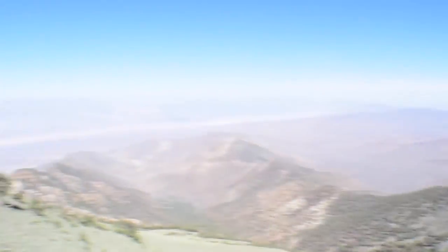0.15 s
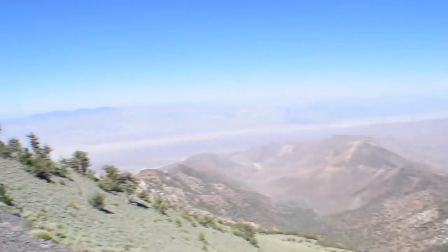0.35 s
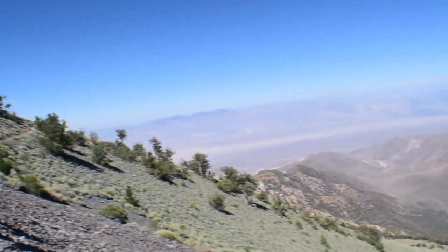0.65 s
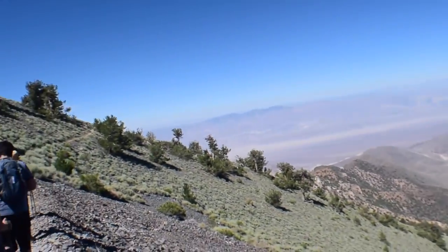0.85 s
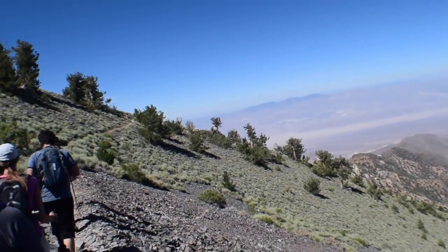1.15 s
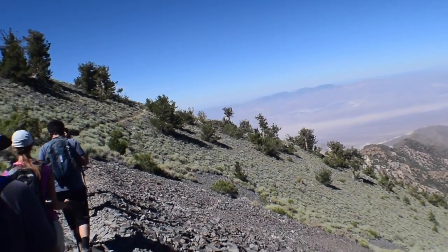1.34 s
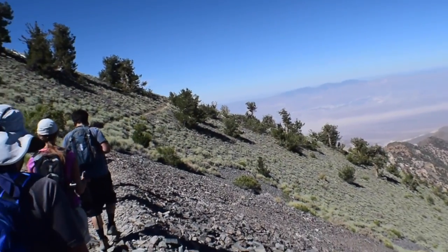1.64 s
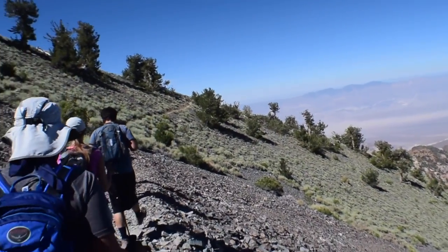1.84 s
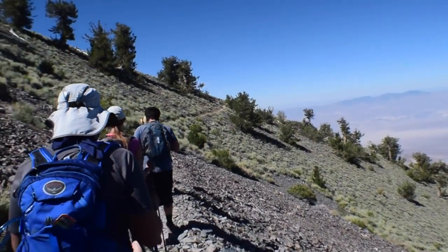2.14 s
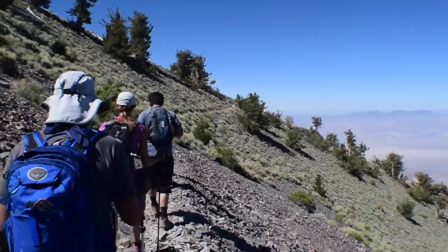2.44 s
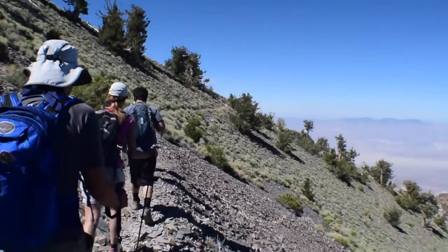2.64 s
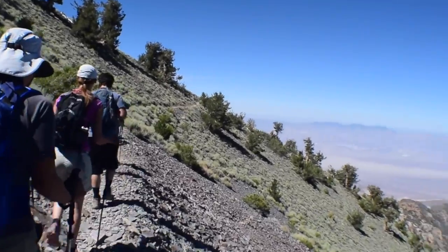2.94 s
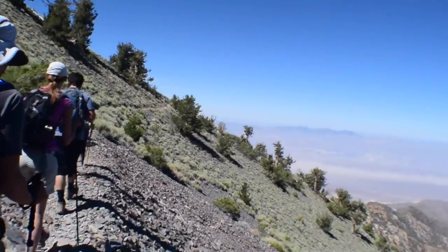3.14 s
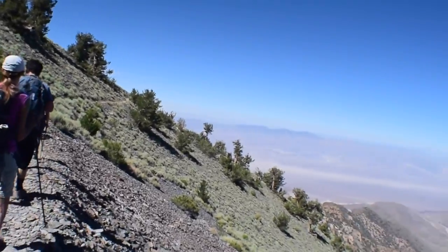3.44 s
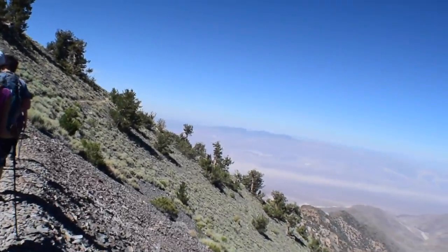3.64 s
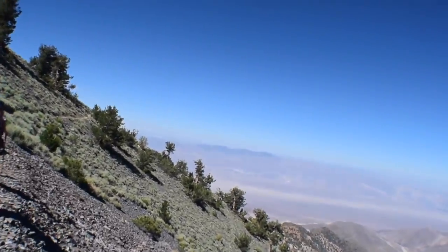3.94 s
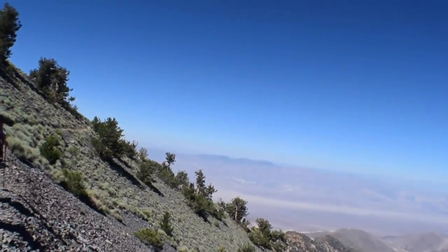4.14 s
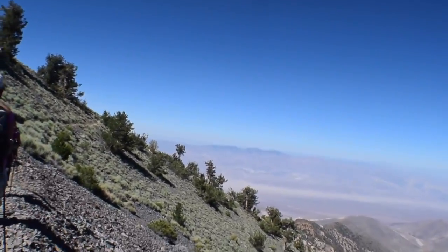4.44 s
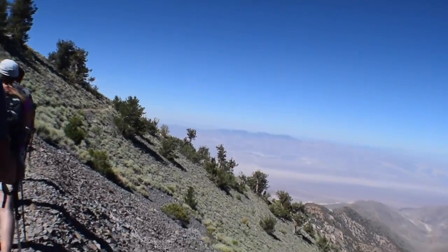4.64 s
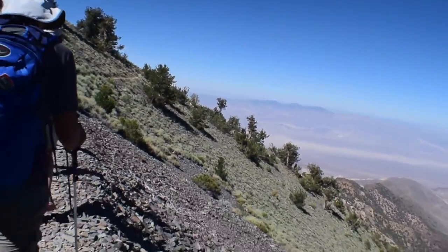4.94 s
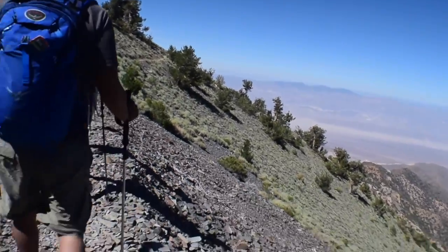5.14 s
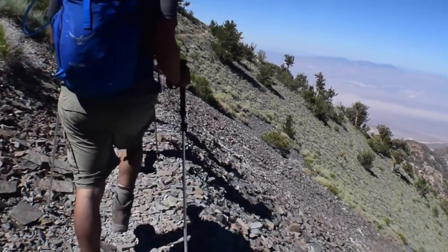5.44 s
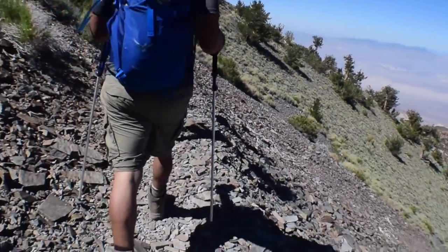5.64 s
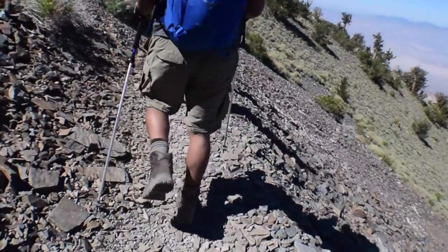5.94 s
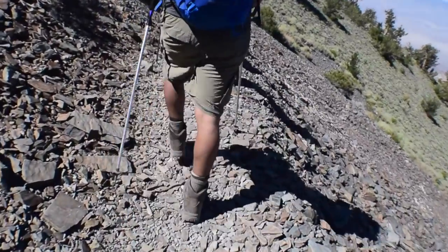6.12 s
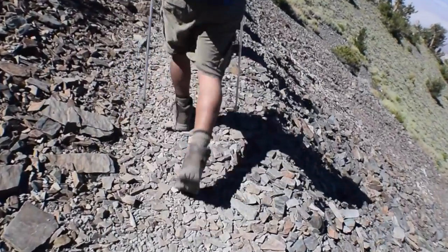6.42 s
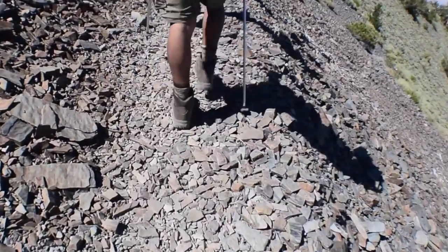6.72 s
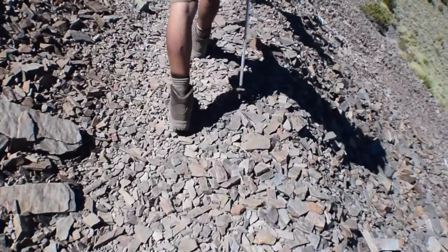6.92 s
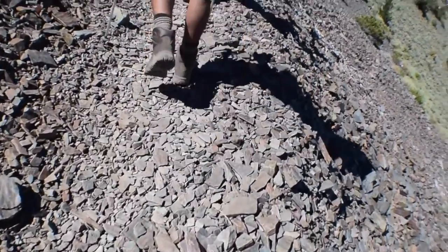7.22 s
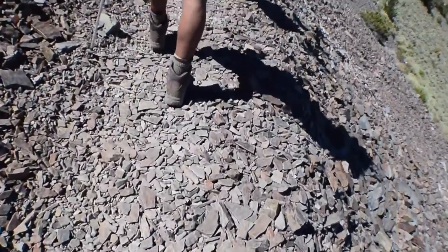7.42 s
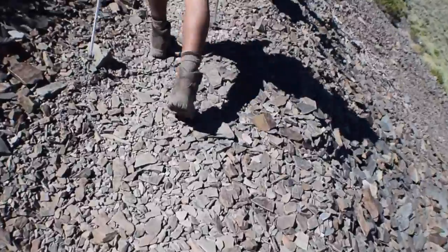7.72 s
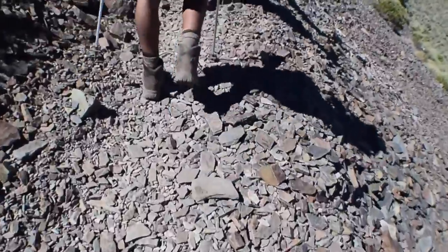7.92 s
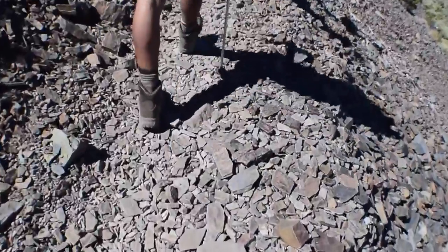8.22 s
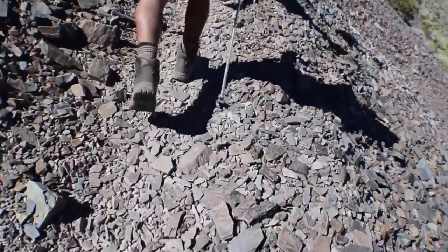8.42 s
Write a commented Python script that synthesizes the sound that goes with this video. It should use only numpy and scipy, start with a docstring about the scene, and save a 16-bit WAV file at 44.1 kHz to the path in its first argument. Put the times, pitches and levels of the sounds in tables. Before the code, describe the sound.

Several hikers crunch across loose flat shale, stone slabs clacking and chips ringing, with short lens-motor buzzes and light wind bumps on the microphone.

```python
"""Open steep slope of loose shale: hikers cross it close to a hand-held camera.
Farther boots are a wash of coloured noise, near boots a crunch of countless short ticks and hiss.
Slabs clack as rough noise bursts plus damped modes, chips ring as single sines until they land.
A lens motor buzzes in short bursts of overtones; light wind on the microphone is lumpy low noise."""
import sys
import numpy as np
from scipy import signal
from scipy.fft import rfft, irfft, next_fast_len
from scipy.io import wavfile
from scipy.ndimage import uniform_filter1d

SR = 44100
rng = np.random.default_rng(int(sys.argv[2]) if len(sys.argv) > 2 else 0)


def dump_mix(stems):
    """Bounce the given channels to the path in sys.argv[1] as a 16-bit WAV at rate SR."""
    frames = np.atleast_2d(stems).T  # one column per channel
    limited = np.clip(frames, -1, 1)  # hard clip at full scale
    pcm = np.round(limited * 32767).astype(np.int16)
    wavfile.write(sys.argv[1], SR, pcm)


N = 377937

# colour of stone on stone: freq_hz, level_db_per_hz
STONE_COLOUR = [(71, -40), (120, -18.5), (214, -6.5), (637, -1.5), (1860, -1), (4070, -2), (10100, -13),
                (14600, -34.5), (15500, -31), (16500, -63)]


def gain_of(db):
    """Decibels to gain."""
    return 10 ** (np.asarray(db) / 20)


def unit_rms(x):
    """Scales to rms 1 along the last axis."""
    return x / np.sqrt(np.mean(x ** 2, axis=-1, keepdims=True) + 1e-20)


def slow_noise(shape, width):
    """Noise smoothed twice over width samples, rms 1."""
    once = uniform_filter1d(rng.standard_normal(shape), width)
    return unit_rms(uniform_filter1d(once, width))


def read_spectrum(points, hz):
    """Interpolates dB values on a log-frequency axis."""
    f, value = np.transpose(points)
    return np.interp(np.log(hz + 1), np.log(f + 1), value)


def curve(rows, column):
    """One table column against time, sample by sample."""
    rows = np.array(rows)
    return np.interp(np.arange(N) / SR, rows[:, 0], rows[:, column])


def add(mix, start_s, sound):
    """Mixes a sound in at a time."""
    part = mix[round(start_s * SR):][:len(sound)]
    part += sound[:len(part)]


def coloured(x, points):
    """Filters x by a spectrum in dB."""
    length = x.shape[-1]
    size = next_fast_len(length)
    gain = gain_of(read_spectrum(points, np.fft.rfftfreq(size, 1 / SR)))
    return irfft(rfft(x, size) * gain, size)[..., :length]


def bands(x):
    """Splits x into body, low and high bands that sum to x."""
    # crossovers: low_to_body_hz, body_to_high_hz
    edges_hz = (1200, 5000)
    length = x.shape[-1]
    size = next_fast_len(length)
    hz, spectrum = np.fft.rfftfreq(size, 1 / SR), rfft(x, size)
    low, below_high = (1 / (1 + (hz / edge) ** 4) for edge in edges_hz)
    shares = (below_high - low, low, 1 - below_high)
    return [irfft(spectrum * share, size)[..., :length] for share in shares]


def far_boots():
    """Distant steps blur into a smooth wash: coloured noise of slowly changing level and treble."""
    # wash spectrum: freq_hz, level_db_per_hz
    wash_colour = [(59, -48), (100, -19), (210, -1.5), (634, 3.5), (4110, -9.5), (9610, -23), (14400, -21),
                   (16000, -40)]
    # wash level: time_s, level_db, treble_re_level_db
    wash_level = [(0, -60, -6), (1.0, -62.5, -3), (2.3, -57.5, -3.5), (3.55, -56.5, 3.5), (5.0, -55, 0),
                  (5.6, -57.5, 2), (7.1, -56, -7), (8.57, -56.5, 6)]
    body, low, high = bands(unit_rms(coloured(rng.standard_normal(N), wash_colour)))
    treble = gain_of(curve(wash_level, 2)) * high
    return gain_of(curve(wash_level, 1)) * (body + low + treble)


def wind(lumpy_db=0.5):
    """Low, lumpy air pressure at the microphone."""
    # wind level: time_s, level_db
    wind_level = [(0.0, -73), (0.19, -87), (0.36, -61), (1.22, -82), (1.41, -56.5), (1.6, -75), (3.65, -81),
                  (3.72, -46.5), (3.87, -63.5), (3.96, -43), (4.3, -86), (4.49, -58), (5.01, -77),
                  (7.21, -81), (7.25, -67.5), (8.57, -89)]
    # wind spectrum: freq_hz, level_db_per_hz
    buffet_colour = [(12, -40), (20, -39), (59, -16.5), (112, -12), (200, -15.5), (260, -49), (440, -120)]
    lumps = gain_of(lumpy_db * slow_noise(N, 2000))
    buffet = unit_rms(coloured(rng.standard_normal(N), buffet_colour) * lumps)
    return buffet * gain_of(curve(wind_level, 1))


def lens_motor(step_hz=333.7, waver_db=4.0, fade_db=6.0):
    """Overtones 7 to 22 of a stepping motor through the camera body, each wavering."""
    # motor bursts: start_s, level_db, length_s
    bursts = [(.265, -46, .125), (.53, -44, .12), (1.86, -46, .12), (2.12, -45, .125), (2.43, -51, .1),
              (2.72, -50, .08), (2.84, -46, .08), (3.04, -50, .09), (3.135, -47, .11), (3.41, -48, .1),
              (5.7, -48, .12), (5.99, -47, .13), (6.3, -50, .11), (6.582, -45, .14)]
    # what the camera body passes on: freq_hz, level_db
    housing = [(2300, -22), (2670, -11), (3000, -10), (3340, -6), (3670, -10), (4005, 0), (4340, -16),
               (5005, -12), (5400, -18), (7400, -24)]
    out = np.zeros(N)
    hz = step_hz * np.arange(7, 23)[:, None]
    for start_s, db, length_s in bursts:
        t = np.arange(0, length_s, 1 / SR)
        phase = rng.random((len(hz), 1))
        waver = waver_db * slow_noise((len(hz), len(t)), 500)
        overtones = np.sin(2 * np.pi * (hz * t + phase))
        buzz = (gain_of(read_spectrum(housing, hz) + waver) * overtones).sum(0)
        fade = gain_of(db - fade_db * t / length_s)
        add(out, start_s, fade * buzz * signal.windows.tukey(len(t), .15))
    return out


def rings(rise_s=.0008, damped_s=.003):
    """A chip or slab sings one bending mode in flight and is damped at once when it lands."""
    # free rings: start_s, pitch_hz, level_db, t60_s, flight_s; the 4010 Hz row at 3.0385 s is a plain tone that
    # sounds with the motor burst there, not a chip
    ring_rows = [(0.0573, 5480, -18.5, 0.024, 0.016), (0.183, 4002, -28, 0.048, 0.0088),
                 (0.817, 2650, -36, 0.076, 0.022), (0.91, 9360, -33, 0.05, 0.05),
                 (0.9674, 9400, -24.5, 0.069, 0.035), (0.969, 14987, -54, 0.12, 0.03),
                 (1.1, 6640, -36, 0.063, 0.04), (1.3413, 6955, -25.5, 0.12, 0.023),
                 (1.352, 9120, -33, 0.077, 0.032), (1.395, 6300, -34, 0.028, 0.015),
                 (1.44, 9100, -42, 0.052, 0.018), (1.638, 5530, -40, 0.037, 0.013),
                 (2.046, 7930, -27, 0.052, 0.02), (2.305, 7821, -45.5, 0.16, 0.05),
                 (2.345, 10295, -46.5, 0.15, 0.025), (2.3587, 7819, -37, 0.042, 0.027),
                 (2.563, 10100, -25, 0.06, 0.015), (2.5624, 4110, -14.5, 0.088, 0.028),
                 (2.585, 7300, -15, 0.024, 0.006), (2.591, 7390, -10.5, 0.038, 0.015),
                 (2.6265, 5338, -18, 0.052, 0.021), (2.6424, 5006, -15.5, 0.11, 0.028),
                 (2.667, 5000, -23.5, 0.11, 0.055), (2.6876, 7950, -26, 0.033, 0.02),
                 (3.0385, 4010, -31, 0.092, 0.042), (3.164, 5300, -20.5, 0.041, 0.013),
                 (3.1653, 10134, -35, 0.062, 0.04), (3.217, 7819, -16.5, 0.056, 0.028),
                 (3.39, 6570, -32, 0.057, 0.015), (3.415, 6600, -44, 0.11, 0.036),
                 (3.7654, 4010, -20, 0.19, 0.029), (3.8025, 5445, -17, 0.055, 0.038),
                 (3.825, 4032, -27, 0.08, 0.02), (3.8457, 3880, -0.5, 0.026, 0.048),
                 (4.0222, 5827, -18, 0.031, 0.019), (4.0348, 3140, -25.5, 0.2, 0.061),
                 (4.036, 6960, -30, 0.08, 0.026), (4.066, 3200, -24, 0.088, 0.035),
                 (4.11, 5870, -36, 0.2, 0.05), (4.11, 7673, -35, 0.1, 0.03),
                 (4.396, 8100, -29, 0.055, 0.021), (4.431, 732, -21.5, 0.038, 0.03),
                 (4.68, 6550, -20, 0.048, 0.015), (4.68, 7560, -25, 0.06, 0.015),
                 (4.6964, 8223, -29, 0.17, 0.047), (4.7807, 6500, -16.5, 0.076, 0.055),
                 (4.7806, 6866, -29.6, 0.286, 0.071), (4.8402, 6514, -21, 0.095, 0.038),
                 (5.109, 5359, -38, 0.422, 0.16), (5.1561, 5370, -18.5, 0.11, 0.048),
                 (5.19, 5364, -43, 0.11, 0.06), (5.279, 9570, -27, 0.041, 0.03),
                 (5.3314, 8917, -23.5, 0.059, 0.041), (5.3431, 7763, -24, 0.064, 0.059),
                 (5.391, 8917, -36.5, 0.19, 0.056), (5.41, 7763, -34, 0.12, 0.033),
                 (5.502, 8928, -24.5, 0.053, 0.042), (5.9818, 8300, -32, 0.04, 0.026),
                 (6.1766, 5472, -28.5, 0.18, 0.05), (6.2456, 10920, -35.5, 0.051, 0.018),
                 (6.393, 7400, -14, 0.1, 0.037), (6.3938, 9318, -36, 0.16, 0.024),
                 (6.394, 5530, -12, 0.024, 0.021), (6.708, 5800, -24.5, 0.027, 0.015),
                 (6.7328, 6368, -36, 0.084, 0.039), (7.591, 10720, -15, 0.015, 0.039),
                 (7.634, 7464, -36, 0.22, 0.036), (7.667, 7464, -23.5, 0.039, 0.029),
                 (7.7422, 8060, -27, 0.047, 0.021), (7.7959, 5585, -33, 0.061, 0.016),
                 (7.8094, 2958, -32.5, 0.07, 0.031), (7.952, 395, -31.5, 0.053, 0.03),
                 (8.3566, 12067, -41.5, 0.039, 0.023), (8.4219, 5700, -20, 0.056, 0.026),
                 (8.4889, 6500, -15, 0.024, 0.034), (8.4893, 5700, -29, 0.138, 0.021)]
    out = np.zeros(N)
    for start_s, hz, db, t60_s, flight_s in ring_rows:
        t = np.arange(0, flight_s + .02, 1 / SR)
        landing = np.exp(-np.maximum(t - flight_s, 0) / damped_s)
        shape = (1 - np.exp(-t / rise_s)) * landing
        tone = np.sin(2 * np.pi * (hz * t + rng.random()))
        add(out, start_s, gain_of(db - 60 * t / t60_s) * shape * tone)
    return out


def slope(x, t60_s=0.048):
    """Short scatter from the stony ground: sparse taps that die fast."""
    t = np.arange(4000) / SR
    taps = rng.choice([-1., 1.], len(t)) * (rng.random(len(t)) < .05)
    taps *= gain_of(-60 * t / t60_s) * (t > .002)
    return signal.oaconvolve(x, taps / np.linalg.norm(taps))[:N]


def clacks(thud_slower=1.63, snap_faster=0.48, spread=0.08, lead_db=-20, lead_s=0.00055,
           rough_db=2.5, push_db=8.5):
    """Each knock is a rough burst plus the slab's damped modes; bass lingers, treble dies first."""
    # slab knocks: time_s, level_db, pitch_hz, thud_re_level_db, snap_re_level_db, t60_s
    knock_rows = [(0.0573, -28, 4610, -33, 9.5, 0.022), (0.151, -26.7, 1890, -32, -10, 0.023),
                  (0.2223, -34, 3300, -12, -5, 0.05), (0.25, -38.5, 1300, 0, 2.5, 0.027),
                  (0.312, -41, 1180, 1.5, -17, 0.025), (0.4091, -25.5, 3120, -8, 5, 0.037),
                  (0.4262, -23, 3490, -38, 9, 0.044), (0.433, -28, 2360, -34, -2, 0.073),
                  (0.4778, -31.5, 1530, 6.3, -21, 0.012), (0.515, -32.5, 1950, -8.5, 5, 0.049),
                  (0.5562, -21, 1180, -2.5, -38, 0.011), (0.6002, -21.5, 1770, -19, 2, 0.025),
                  (0.627, -33.5, 1220, 1.5, -14, 0.0094), (0.662, -32, 2276, -22, -10, 0.1),
                  (0.7187, -34.5, 2470, -14, -21, 0.075), (0.7548, -37, 2330, -5.5, 1, 0.21),
                  (0.7884, -26, 1690, -10, -17.5, 0.012), (0.8598, -38.5, 2460, -8, 3.5, 0.09),
                  (1.0349, -40.5, 2220, -14, -21, 0.057), (1.0586, -35.5, 2180, -9, -29, 0.083),
                  (1.1004, -38.5, 2180, -10, 5, 0.044), (1.2157, -34.5, 2100, -25, 2, 0.02),
                  (1.227, -29.5, 4200, -30, -1, 0.012), (1.243, -37.5, 4230, -12, 1.5, 0.052),
                  (1.3051, -19.5, 2120, -23, -5.5, 0.041), (1.3324, -25.5, 1680, -15, -27, 0.039),
                  (1.381, -42, 3100, -20, 1, 0.03), (1.4994, -39, 1230, 1, -24, 0.018),
                  (1.534, -48, 1210, 9, -13.8, 0.02), (1.6925, -29.5, 1530, -14.5, -2.5, 0.037),
                  (1.742, -29, 2070, -29, -8, 0.022), (1.7609, -22.5, 4760, -30, 2.5, 0.022),
                  (1.7716, -29.5, 2220, -15.5, -11, 0.12), (1.786, -10, 1540, -28, -11, 0.012),
                  (1.8601, -28.5, 4040, -18, -11, 0.047), (1.9119, -23.5, 1580, -6.5, -10.8, 0.028),
                  (1.9384, -20.5, 3530, -27, -0.5, 0.016), (2.0284, -35.5, 4180, -4.5, 4.5, 0.036),
                  (2.046, -35, 2100, -14, 1, 0.034), (2.0674, -26.5, 2316, -18, -18, 0.07),
                  (2.16, -37.5, 1940, 2, -7, 0.044), (2.344, -33, 2180, -14, -3, 0.025),
                  (2.532, -37, 2500, 2, -18, 0.024), (2.545, -22, 5020, -20, 12, 0.024),
                  (2.5613, -15, 4170, -22, -2, 0.032), (2.5704, -26.5, 2680, -10, -3, 0.072),
                  (2.5896, -13.5, 3250, -18, -4, 0.04), (2.6264, -20, 4050, -36, -8.5, 0.049),
                  (2.6393, -20.5, 3170, -16, -3, 0.046), (2.6657, -21, 4700, -13, 10, 0.02),
                  (2.765, -40.5, 4170, -18, 6.5, 0.038), (2.91, -47, 4800, -23, 9, 0.031),
                  (2.9888, -31.5, 4080, -12, -22, 0.036), (3.004, -37, 2500, -6, -2, 0.022),
                  (3.0378, -21.5, 4170, -17.5, -10, 0.034), (3.0639, -32, 1500, -26, -11, 0.044),
                  (3.083, -34.5, 2370, -14, -6, 0.036), (3.103, -43.5, 4500, -20, 13, 0.025),
                  (3.1177, -34, 2630, -26, -4.5, 0.022), (3.1654, -35.5, 4940, 3, 6.2, 0.026),
                  (3.2144, -10.5, 2104, -19.5, -4.5, 0.043), (3.244, -29.5, 2530, -19, -20, 0.088),
                  (3.2737, -31.5, 1750, -12, -8, 0.076), (3.3115, -30, 3150, -12, 5, 0.042),
                  (3.3467, -19, 5070, -29, -15, 0.012), (3.3579, -23.5, 2730, -6.5, -11, 0.032),
                  (3.412, -25, 3600, -37, 5, 0.0098), (3.5356, -24.5, 1800, -7.5, -9, 0.042),
                  (3.635, -30, 3400, -28, 0, 0.047), (3.648, -26, 4830, -31.5, -2, 0.053),
                  (3.669, -21, 2120, -18.5, -25, 0.028), (3.6944, -28, 3460, -18, -3, 0.025),
                  (3.7017, -29, 2030, -30, -8, 0.044), (3.7206, -26.5, 3870, -34, -3.5, 0.052),
                  (3.7325, -19, 4330, -25, -21, 0.017), (3.765, -21, 3920, -15.5, -30, 0.033),
                  (3.778, -30, 3780, -19, -16, 0.14), (3.803, -21.5, 2580, -13.5, -14, 0.034),
                  (3.8455, -10, 3820, -22, -12, 0.017), (3.9299, -24.5, 2630, -12.5, -7.5, 0.047),
                  (3.9447, -26.5, 2200, -23, -3, 0.032), (3.9785, -15.5, 3350, -14.5, -22, 0.038),
                  (4.0058, -19.5, 2740, -9.5, -5.5, 0.046), (4.0197, -25, 2280, -30, -10, 0.069),
                  (4.0353, -24.5, 3200, -29, -19, 0.035), (4.0677, -22.5, 3200, -35, -1, 0.021),
                  (4.087, -32, 3170, -12, -13, 0.12), (4.126, -19, 1570, -13, -2, 0.014),
                  (4.137, -13.5, 1750, -7.5, -23, 0.019), (4.149, -15.5, 1340, -12.5, -4, 0.024),
                  (4.1845, -24, 1425, -18, -10, 0.048), (4.3263, -23.5, 3000, -20, -6, 0.022),
                  (4.338, -22, 2010, -17, -15, 0.042), (4.4003, -20.5, 4530, -37, -3.5, 0.03),
                  (4.43, -29, 3280, -0.5, 0.5, 0.027), (4.4738, -29.5, 2210, -15, -26, 0.035),
                  (4.5192, -29, 2950, -17.5, -11, 0.038), (4.6162, -27.5, 3410, -12, -13, 0.055),
                  (4.6748, -33, 2570, -20.5, 3, 0.096), (4.6942, -12.5, 2370, -20.5, -2, 0.03),
                  (4.7508, -26, 3440, -3, -3, 0.019), (4.763, -30, 3060, -14, -2, 0.033),
                  (4.777, -20, 4290, -24.5, -15, 0.034), (4.8116, -25.5, 1640, -10.5, -18, 0.025),
                  (4.8254, -17, 2380, -27, 3.5, 0.02), (4.84, -25, 3980, -16, -19, 0.025),
                  (5.0049, -34, 4130, -4, -10.5, 0.032), (5.0174, -26, 1720, -19, -3, 0.021),
                  (5.064, -43.5, 1470, -10, 2, 0.04), (5.1047, -20, 4200, -42, -9.5, 0.034),
                  (5.262, -27.5, 1300, -10.5, -16, 0.029), (5.2787, -13.5, 2750, -23, -9.5, 0.021),
                  (5.326, -28.5, 2200, -12.5, 3.5, 0.056), (5.417, -36.5, 3130, -24, 10, 0.021),
                  (5.562, -30.5, 2750, -32, -8, 0.015), (5.657, -50.5, 1243, 6.5, 16, 0.21),
                  (5.874, -31, 1770, -22, -26, 0.028), (5.9034, -37.5, 1230, -8, 3, 0.095),
                  (5.9801, -28.5, 2520, -8.5, 4, 0.028), (6.0782, -28.5, 1850, -33, -10, 0.017),
                  (6.152, -27.5, 4400, -17, -6, 0.063), (6.179, -20.5, 2800, -21, 2, 0.044),
                  (6.2132, -33.5, 5280, -37, -3, 0.036), (6.321, -36, 4650, -11.5, 5, 0.14),
                  (6.394, -23.5, 4570, -33, 14, 0.013), (6.48, -29, 2690, -27, -7.5, 0.011),
                  (6.7073, -39, 4930, -24, -2, 0.031), (6.763, -41.5, 4430, 2, 15.5, 0.022),
                  (6.946, -34.5, 4010, -24, -1, 0.066), (6.9645, -29, 3800, -35.5, -5.5, 0.019),
                  (7.1875, -38, 4200, -16, 6.5, 0.067), (7.2245, -45.5, 3580, -25.5, 12, 0.089),
                  (7.5622, -37, 1750, -1.5, -8, 0.041), (7.592, -22, 4760, -14, 17.5, 0.0082),
                  (7.6071, -22, 1700, -33, 1, 0.019), (7.6342, -21, 2650, -33, 1, 0.0092),
                  (7.704, -40, 4270, -12, 5, 0.032), (7.73, -33, 2600, -29, 5, 0.032),
                  (7.7383, -38, 2590, -15.5, 4.5, 0.18), (7.8598, -23, 1190, -13, -2.5, 0.091),
                  (7.934, -25.5, 3170, -7, -17, 0.022), (7.9404, -34, 3130, -5, 2.5, 0.085),
                  (8.3678, -45.5, 4010, -10, 9, 0.038), (8.394, -33, 5050, -20, 24, 0.0071),
                  (8.407, -39.5, 2820, -25, 24, 0.035), (8.4201, -46, 5000, -21, 15, 0.12),
                  (8.488, -31.5, 2360, -14, 14.5, 0.037), (8.502, -37, 2470, -3, 10, 0.089)]
    # slab modes: multiple_of_pitch, level_db
    slab_modes = [(0.601, -15), (0.998, 4), (1.501, -3.5), (2.2, -51.5)]
    out, ahead_s = np.zeros(N), 512 / SR
    t = np.arange(4096) / SR - ahead_s
    after = np.maximum(t, 0)
    # edges scrape for an instant before the blow lands
    onset = gain_of(lead_db) * np.exp(np.minimum(t, 0) / lead_s) + 1 - np.exp(-after / .0007)
    # the slab's whole mass is shoved once: a swing that slows as it dies
    swing = np.sin(2 * np.pi * (after / .0007) ** .7)
    push = gain_of(push_db) * swing * np.exp(-after / .0013)

    shape = (len(knock_rows), len(t))
    noise = [unit_rms(b) for b in bands(coloured(rng.standard_normal(shape), STONE_COLOUR))]
    rough = unit_rms(uniform_filter1d(rng.standard_normal(shape), 60))
    rattles = gain_of(rough_db * rough)
    chance = rng.random((len(knock_rows), 2, len(slab_modes), 1))
    multiple, mode_db = np.transpose(slab_modes)[:, :, None]
    for row, body, low, high, rattle, (tune, phase) in zip(knock_rows, *noise, rattles, chance):
        time_s, db, hz, thud_db, snap_db, t60_s = row
        mode_hz = hz * multiple * (1 + spread * (2 * tune - 1))
        modes = np.sin(2 * np.pi * (mode_hz * t + phase))
        modes *= gain_of(mode_db - 75 * (.5 + multiple) * after / t60_s)  # higher modes die sooner
        knock = modes.sum(0) + body * gain_of(-3 - 60 * after / t60_s)
        knock += high * gain_of(snap_db - 60 * after / (t60_s * snap_faster))
        thud = push + low * gain_of(-60 * after / (t60_s * thud_slower))
        knock = knock * rattle + gain_of(thud_db) * thud
        add(out, time_s - ahead_s, gain_of(db) * knock * onset)
    return out


def grinding(curl=1.02):
    """Each grind swells and fades at its own pace; gains of crunch, low grind and fine grit."""
    # boot grinds: peak_s, level_db, swell_s_per_10_db, fade_s_per_10_db (signs of both unused),
    # low_grind_re_level_db, fine_grit_re_level_db
    grinds = [(0.0, -35.5, .05, 0.1, -11.5, -13), (.13, -43.5, -0.5, 0.08, -11.5, -24),
              (.3, -46.5, 0.05, 0.1, 0.5, -20.5), (0.425, -40.5, .03, .04, -8.5, -2),
              (.53, -43.5, 0.08, 0.25, -9, -14.5), (.79, -39.5, .15, .08, -6.5, -24),
              (0.889, -42, -0.02, 0.02, -0.5, -0.5), (1.041, -45, -0.15, 0.25, -3.5, -8.5),
              (1.329, -42, .1, 0.1, -4, -10.5), (1.5, -56.5, 0.2, 0.26, 5, -9),
              (1.774, -44, 0.09, 0.13, -14.5, -12), (1.93, -42, 0.16, 0.03, -3, -13),
              (2.057, -43.5, 0.1, .2, -8, -10.5), (2.44, -47, .1, 0.15, 4, -5.5),
              (2.582, -27, 0.0266, 0.0864, -11, -16), (2.85, -48.5, 0.07, .1, -4.5, -15),
              (3.059, -45.5, 0.16, 0.1, -9, -20), (3.233, -36, 0.12, 0.1, -7.5, -15),
              (3.39, -42, -0.02, -0.1, -6, 1.5), (3.654, -47, -0.3, .2, -14, -22),
              (3.791, -37, 0.09, 0.1, -10, -14.5), (4.006, -26.5, 0.0369, 0.0673, -10, -14),
              (4.163, -32.5, 0.05, 0.05, -9, -17), (4.29, -43, 0.02, 0.16, -3, -15),
              (4.416, -41, 0.07, 0.05, -7, -12), (4.697, -39, 0.06, 0.12, -8, -11),
              (4.831, -46.5, 0.27, 0.12, -16, -4.5), (4.98, -52, .1, 0.5, -1.5, -8),
              (5.13, -40, 0.01, 0.1, -6.5, -8), (5.332, -37, 0.05, 0.0943, -8.5, -3),
              (5.672, -46.5, 0.05, 0.23, -1.5, -6), (5.988, -42, 0.2, 0.14, -6.5, -12.5),
              (6.178, -51.5, .03, .15, -8, -5), (6.34, -45, 0.08, 0.12, -2, 1.5),
              (6.657, -44, 0.07, 0.19, -0.5, -4), (6.972, -45, 0.08, 0.24, -4.5, -3.5),
              (7.288, -41.5, 0.02, .06, 1, -1.5), (7.37, -48.5, 0, 0.15, 2, -5),
              (7.588, -46, -0.07, 0.2, -5, -0.5), (7.754, -38, 0, -0.04, -7.5, -5),
              (7.88, -46, .02, 0.13, -2.5, 2.5), (8.088, -51, 0.2, 0.35, 0.5, -9),
              (8.28, -49, -0.04, 0.3, 2, 5), (8.413, -42.5, -0.06, 0.5, -11, -7)]
    t = np.arange(0, N + 64, 64) / SR
    peak_s, db, swell, fade, low_db, grit_db = np.transpose(grinds)[:, :, None]
    distance = np.maximum((peak_s - t) / abs(swell), (t - peak_s) / abs(fade))
    each = gain_of(db - 10 * distance ** curl)  # curl above 1 rounds the peak, cuts the ends sooner
    gains = []
    for re_db in (0, low_db, grit_db):
        power_sum = np.linalg.norm(each * gain_of(re_db), axis=0)
        gains.append(np.interp(np.arange(N) / SR, t, power_sum))
    return gains


def scree(per_s=900, size_db=5.5, hiss_db=-4, sparkle=0.68, clump_db=2.5, chime_db=-10,
          chime_s=0.0059, rumble=0.58):
    """Countless pebbles tick in clumps, each a short rough burst, over the hiss of sand and dust."""
    count, tick_s = 30, .001
    size = gain_of(size_db * np.minimum(rng.exponential(1, N), 3.2)) * (rng.random(N) < per_s / SR)
    pebble, t, ticks = rng.integers(0, count, N), np.arange(1500) / SR, np.zeros(N)
    for k, hz in enumerate(np.geomspace(500, 14000, count)):
        colour = signal.butter(1, [hz / 2, min(hz * 3, SR / 2.2)], "bandpass", fs=SR)
        burst = unit_rms(signal.lfilter(*colour, rng.standard_normal(len(t))))
        tick = burst * np.exp(-t / (tick_s * rng.uniform(0.28, 1.5)))
        # each pebble rings faintly
        tick += gain_of(chime_db) * np.exp(-t / chime_s) * np.sin(2 * np.pi * hz * t)
        ticks += signal.oaconvolve(size * (pebble == k), tick / np.linalg.norm(tick))[:N]

    clumps_db = clump_db * slow_noise(N, 500)
    hiss = rng.standard_normal(N) * gain_of(hiss_db + clumps_db / 3)
    grit = unit_rms(ticks) * gain_of(clumps_db) + hiss
    crunch, grind, fine = (unit_rms(band) for band in bands(coloured(grit, STONE_COLOUR)))
    # buried stones grind smoothly
    buried = unit_rms(bands(coloured(rng.standard_normal(N), STONE_COLOUR))[1])
    grind = unit_rms(grind + rumble * buried)
    # the finest grit is brighter than the slabs
    fine = unit_rms(fine - sparkle * np.diff(fine, 2, prepend=[0, 0]))
    return sum(gain * band for gain, band in zip(grinding(), (crunch, grind, fine)))


def facing(x, top_hz=11000, turn_s=(5.1, 5.8), lift_db=3):
    """The camera turns down to the ground and the top treble of the stones comes up."""
    top = signal.sosfiltfilt(signal.butter(2, top_hz, "highpass", fs=SR, output="sos"), x)
    lift = gain_of(np.interp(np.arange(N) / SR, turn_s, (0, lift_db)))
    return x + top * (lift - 1)


def scene():
    """All sources at one microphone."""
    knocks = clacks()
    stones = knocks + gain_of(-10.5) * slope(knocks) + rings() + scree()
    stones = facing(stones) + far_boots()
    # the stones' sound is cut below 110 Hz
    stones = signal.sosfilt(signal.butter(2, 110, "highpass", fs=SR, output="sos"), stones)
    return (stones + lens_motor() + wind())[None]


def record(dry, hiss_db=-81, ceiling=.75, bass_cut_hz=30, top_hz=16600):
    """Microphone: faint hiss, input rounding the hardest blows, deepest bass cut, then band limit."""
    hissing = dry + gain_of(hiss_db) * rng.standard_normal(N)
    rounded = ceiling * np.tanh(hissing / ceiling)
    rounded = signal.sosfilt(signal.butter(1, bass_cut_hz, "highpass", fs=SR, output="sos"), rounded)
    band_limit = signal.firwin(511, top_hz, window=("kaiser", 9), fs=SR)
    return signal.oaconvolve(rounded, band_limit[None], "same")


dry = scene()
out = record(dry)
dump_mix(out)
```